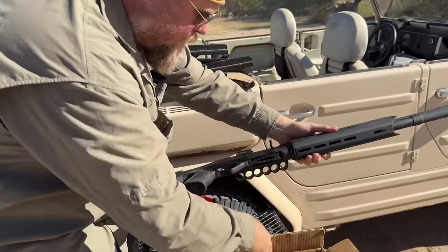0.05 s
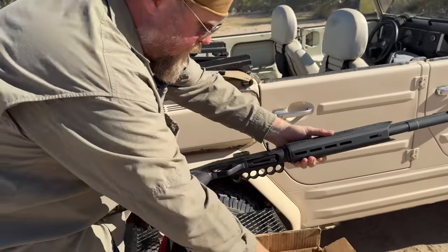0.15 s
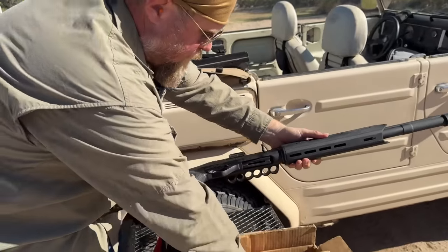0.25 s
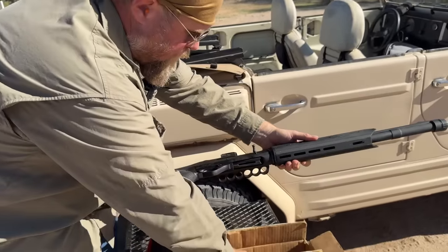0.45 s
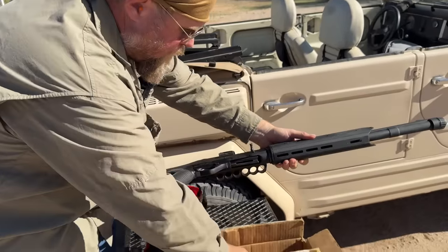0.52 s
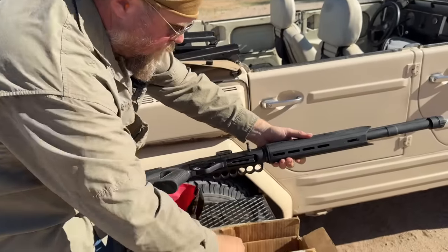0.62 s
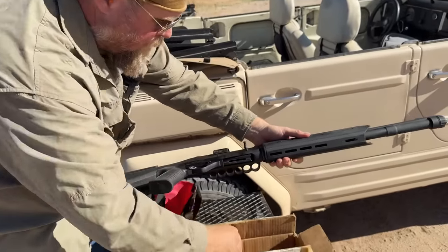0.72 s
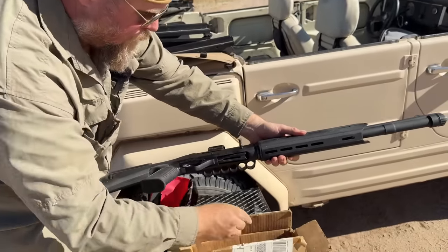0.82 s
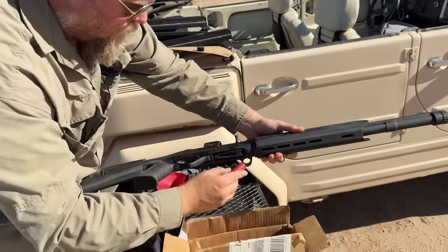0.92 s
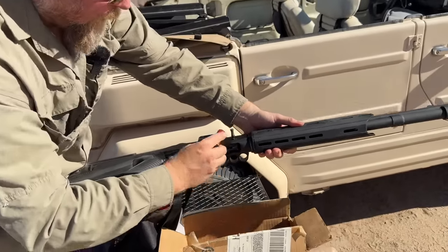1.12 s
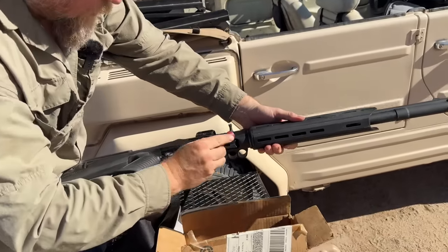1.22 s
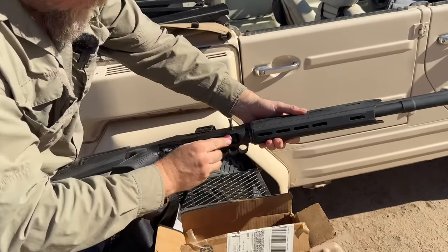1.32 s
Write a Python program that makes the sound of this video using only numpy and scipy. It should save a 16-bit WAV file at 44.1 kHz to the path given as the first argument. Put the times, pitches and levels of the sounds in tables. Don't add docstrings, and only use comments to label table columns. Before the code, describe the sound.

Close up outdoors, loose shells tick sharply together and thump a cardboard box, pause, then rattle again as one is dragged out; soft cloth rustle continues, and small metallic taps on a gun finish.

```python
import sys
import numpy as np
from scipy import signal
from scipy.io import wavfile
from scipy.ndimage import uniform_filter1d

SR = 44100
rng = np.random.default_rng(int(sys.argv[2]) if len(sys.argv) > 2 else 0)


def master(y):
    cut = np.clip(np.atleast_2d(y).T, -1, 1)
    pcm = np.round(cut * 32767)
    wavfile.write(sys.argv[1], SR, pcm.astype(np.int16))


def ratio_of_db(decibels):
    return 10 ** (np.asarray(decibels, float) / 20)


N = 59535


def evened(x):
    return x / np.sqrt(np.mean(x ** 2) + 1e-20)


def add(mix, s, sound):
    part = mix[round(s * SR):][:len(sound)]
    part += sound[:len(part)]


def curve(points, column=1):
    rows = np.array(points)
    return np.interp(np.arange(N) / SR, rows[:, 0], rows[:, column])


def colour(x, points):
    f, db = np.transpose(points)
    hz = abs(np.fft.fftfreq(8192, 1 / SR))
    spectrum_db = np.interp(np.log(hz + 1), np.log(f + 1), db, left=-60)
    log_gain = np.log(ratio_of_db(spectrum_db))
    taps = np.fft.ifft(np.exp(signal.hilbert(log_gain).conj())).real[:3000]
    return signal.oaconvolve(x, taps / np.linalg.norm(taps))[:len(x)]


def dull(x, hz):
    keep = np.exp(-2 * np.pi * hz / SR)
    return signal.lfilter([(1 - keep) ** 2], [1, -2 * keep, keep ** 2], x)


def ring(hz, t60, rise):
    t = np.arange(4000) / SR
    return np.sin(2 * np.pi * hz * t) * (1 - np.exp(-t / rise)) * ratio_of_db(-60 * t / t60)


def grains(per_s, spread_db):
    size = ratio_of_db(spread_db * np.minimum(rng.exponential(1, N), 3))
    return rng.standard_normal(N) * size * (rng.random(N) < per_s / SR)


# [f/Hz, level/dB per Hz]
AIR_SPECTRUM = [(25, -7), (70, 9.5), (130, 6.5), (400, 4.5), (1000, -0.5), (4600, -30), (10000, -23.5),
                (16000, -48)]
AIR_DB, AIR_FADE_DB_PER_S = -65, -6.5


def air():
    smooth = uniform_filter1d(uniform_filter1d(rng.standard_normal(N), 2500), 2500)
    level_db = AIR_DB + AIR_FADE_DB_PER_S * np.arange(N) / SR + evened(smooth)
    return ratio_of_db(level_db) * evened(colour(rng.standard_normal(N), AIR_SPECTRUM))


# [t/s, rustle level/dB, sheen level/dB]
SLEEVE_MOTION = [(0, -65, -75), (.07, -65, -69), (.12, -63, -83), (.2, -65, -76), (.42, -62.5, -79),
                 (.58, -72.5, -79), (.8, -68.5, -72.5), (.9, -71.5, -81), (.98, -79.5, -104),
                 (1.08, -70, -84), (1.24, -77, -105), (1.3, -73.5, -102)]
# [f/Hz, level/dB per Hz]
RUSTLE_SPECTRUM = [(500, 2), (1200, -1.5), (2000, 2.5), (3800, 3), (5500, -4), (9000, -6), (14000, -30)]
# [f/Hz, level/dB per Hz]
SHEEN_SPECTRUM = [(3000, -29), (7000, -18.5), (12000, -21.5), (15500, -30), (16500, -45)]
CRINKLE_PER_S, CRINKLE_DB = 1000, -1.5


def sleeve():
    crinkles = evened(grains(CRINKLE_PER_S, 2.1))
    rubbing = rng.standard_normal(N) + ratio_of_db(CRINKLE_DB) * crinkles
    rustle = evened(colour(rubbing, RUSTLE_SPECTRUM)) * ratio_of_db(curve(SLEEVE_MOTION))
    sheen = evened(colour(rng.standard_normal(N), SHEEN_SPECTRUM))
    return rustle + sheen * ratio_of_db(curve(SLEEVE_MOTION, column=2))


# [t/s, level/dB]
STIR = [(0, -64.5), (.212, -67), (.225, -42.5), (.39, -40), (.43, -56), (.6, -51.5), (.72, -69.5),
        (.822, -78.5), (.832, -40.5), (.95, -59), (.985, -64.5), (1.24, -77.5), (1.29, -61.5),
        (1.33, -65.5)]
# [f/Hz, width/Hz, level/dB]
BOX_MODES = [(146, 76, -12.5), (222, 92, -3), (293.7, 75, 3), (386.7, 54.7, 3), (465.6, 64, 1),
             (525, 73, -3.5), (702, 79.3, -1.5)]
STIR_PER_S, STIR_SPREAD_DB = 500, 3.5


def hollow(x):
    out = np.zeros(N)
    for hz, width, db in BOX_MODES:
        out += ratio_of_db(db) * signal.oaconvolve(x, ring(hz, 1.57 / width, 0.0052))[:N]
    return out


def shuffle():
    return evened(hollow(grains(STIR_PER_S, STIR_SPREAD_DB))) * ratio_of_db(curve(STIR))


def chatter():
    clinks = np.zeros(N)
    for hz in np.geomspace(1900, 6500, num=12):
        clinks += signal.oaconvolve(grains(99, 0.92), ring(hz, 0.0041, 0.00028))[:N]
    return evened(clinks) * ratio_of_db(curve(STIR) - 25)


# [t/s, peak level/dB, ring f/Hz, crack against ring/dB, crack t60/s]
TICKS = [(.1938, -57, 9000, 12, 0.022), (.2167, -38.5, 8550, -5, 0.016), (.2255, -30, 3280, -7, 0.048),
         (.250, -36.5, 3170, -11, 0.028), (.278, -43.5, 3150, 2, 0.049), (.2841, -39.5, 3800, 4.5, 0.021),
         (.2895, -43, 7130, 5.5, 0.019), (.2975, -41.5, 3800, 0, .035), (.313, -43, 3830, -16, .02),
         (.320, -36, 1800, -5, 0.011), (.3245, -52, 10400, -7, .02), (.3375, -58, 8200, -2, .015),
         (.3417, -34.5, 3960, 3, 0.024), (.3682, -43.5, 7800, 8.5, 0.024), (.3784, -34.5, 8050, 2.5, 0.018),
         (.3946, -39, 3840, -4, 0.024), (.4145, -45, 3780, -17, 0.027), (.439, -59, 7060, 4, 0.014),
         (.4435, -48, 8030, 7, 0.027), (.4527, -52.5, 5470, 11.5, 0.028), (.467, -62, 7040, 4, 0.034),
         (.4752, -41.5, 7350, 3, 0.026), (.4876, -41.5, 5380, -2, 0.009), (.5056, -43.5, 2460, 5.5, 0.018),
         (.5385, -60, 6940, 6, .03), (.5612, -34.5, 6970, 3, 0.028), (.5615, -48, 12300, -5, 0.016),
         (.6087, -40, 6900, -6.5, 0.026), (.7482, -40, 2070, -12, .02), (.788, -50, 2440, -9, 0.025),
         (.8255, -44, 6600, 8.5, 0.01), (.8462, -44, 5230, 4, .025), (.8455, -38, 3300, 1, .02),
         (.8618, -36, 3930, -8, 0.026), (.8738, -34, 3640, -7.5, 0.026), (.9086, -51, 6600, -6, 0.025),
         (.9283, -41.5, 3700, -7.5, 0.037), (.935, -47.5, 6700, -9, 0.029)]
# [f/Hz, level/dB per Hz]
CRACK_SPECTRUM = [(600, 2.5), (1200, -0.5), (3200, 2.5), (7000, 1), (12500, -6.5), (15800, -25),
                  (17000, -56)]
TICK_T60, RATTLE_S, TICK_SPREAD = 0.011, 0.0036, 0.09
TICK_RISE_S, SNAP_T60 = 0.00062, 0.0033


def clicks(rows, snap_db, rise):
    rings, cracks, t = np.zeros(N), np.zeros(N), np.arange(2000) / SR
    for s, db, hz, crack_db, crack_t60 in rows:
        add(rings, s, 0.76 * ratio_of_db(db) * ring(hz, TICK_T60, TICK_RISE_S))
        for off, late in rng.random((4, 2)):
            near_hz = hz * (1 + TICK_SPREAD * (2 * off - 1))
            add(rings, s + RATTLE_S * late, 0.34 * ratio_of_db(db) * ring(near_hz, TICK_T60, TICK_RISE_S))
        crack = ratio_of_db(-60 * t / crack_t60) * (1 - np.exp(-t / rise))
        snap = ratio_of_db(snap_db - 60 * t / SNAP_T60)
        hiss = dull(rng.standard_normal(2000), 2.62 * hz)
        add(cracks, s, ratio_of_db(db + crack_db - 7.0) * (crack + snap) * hiss)
    return rings + colour(cracks, CRACK_SPECTRUM)


def ticks():
    return clicks(TICKS, snap_db=-6.5, rise=TICK_RISE_S)


# [t/s, peak level/dB, wall f/Hz, contact/s]
KNOCKS = [(0.2204, -24.5, 578, 0.0022), (.227, -30, 510, 0.0018), (.259, -35.5, 558, 0.004),
          (.2855, -32.5, 438, 0.0076), (0.304, -36.5, 411, 0.0083), (.3215, -51, 695, 0.0027),
          (0.327, -40, 460, 0.002), (.340, -33.5, 528, 0.0042), (.367, -36.5, 604, 0.0063),
          (0.3812, -18, 255, 0.0016), (.396, -29.5, 384, 0.01), (.420, -38.5, 389.5, 0.023),
          (0.459, -32.5, 354, 0.0016), (.434, -32, 333, 0.0016), (.470, -41.5, 330, 0.0017),
          (0.479, -40.5, 316, 0.0066), (.541, -44, 585, 0.0019), (.552, -45, 717, 0.0043),
          (.565, -32.5, 410, 0.0054), (.573, -35.5, 390, 0.0015), (0.7496, -38, 496, 0.001),
          (.776, -45, 664, 0.0012), (.832, -31.5, 433, 0.0016), (.839, -37.5, 320, 0.0032),
          (.863, -41, 300, 0.0038), (.880, -34, 401, 0.0069), (0.91, -42.5, 430, 0.007),
          (0.932, -40.5, 420, 0.0052), (.946, -46, 347, 0.0023), (1.016, -48.5, 475, 0.0014),
          (1.058, -61, 500, 0.0034), (1.202, -56.5, 450, 0.0059), (1.222, -58, 540, .004),
          (1.301, -52, 648, .002)]
BOX_SHARE_DB = -0.5


def knock(hz, contact):
    u = np.arange(3000) / SR / contact
    return u ** 2 * np.exp(2 - 2 * u) * np.sin(2 * np.pi * hz * (u - 1) * contact)


def knocks():
    walls, pushes = np.zeros(N), np.zeros(N)
    for s, db, hz, contact in KNOCKS:
        add(walls, s - contact, ratio_of_db(db) * knock(hz, contact))
        add(pushes, s, ratio_of_db(db + BOX_SHARE_DB) * np.ones(1))
    return walls + .5 * hollow(pushes)


# [t/s, peak level/dB, f/Hz, t60/s]
SINGING = [
    (.284, -58, 5930, .05),
    (.303, -60, 5960, .12),
    (.3245, -60, 5880, .06),
]


def singing():
    out = np.zeros(N)
    for s, db, hz, t60 in SINGING:
        add(out, s, ratio_of_db(db) * ring(hz, t60, 0.0012))
    return out


# [t/s, f/Hz]
WHISTLES = [
    [(.63, 8400), (.655, 8800), (.69, 8350), (.72, 8600), (.752, 9950), (.77, 9500), (.795, 9800)],
    [(.765, 14200), (.78, 14300), (.805, 14100), (.845, 12300), (.86, 11600)],
    [(.785, 11150), (.8, 11300), (.825, 11000), (.85, 10400)],
    [(.885, 12300), (.905, 11700)],
    [(.78, 8900), (.81, 9000), (.825, 8800)],
    [(.68, 12100), (.72, 12300)],
]
WHISTLE_DB = [-80, -81, -80, -84, -83, -87]


def whistles():
    out, t = np.zeros(N), np.arange(N) / SR
    for rows, db in zip(WHISTLES, WHISTLE_DB):
        gate = np.clip(np.minimum(t - rows[0][0], rows[-1][0] - t) / .008, 0, 1)
        waver = evened(uniform_filter1d(rng.standard_normal(N), size=200))
        wobble = evened(uniform_filter1d(rng.standard_normal(N), size=200))
        hz = uniform_filter1d(curve(rows), size=500) + 20 * wobble
        tone = np.sin(2 * np.pi * np.cumsum(hz) / SR)
        out += gate * (1 + .25 * waver) * ratio_of_db(db + 3) * tone
    return out


# [t/s, level/dB]
DRAG = [(.73, -118), (.742, -51.5), (.76, -57.5), (.77, -67), (.79, -52), (.81, -55), (.822, -84)]
# [f/Hz, level/dB per Hz]
CARD_SPECTRUM = [(150, -15), (400, -12.5), (850, -11.5), (1400, -21), (2400, -15.5), (4300, -32),
                 (7000, -36), (14000, -73)]


def drag():
    scrape = grains(1500, 3.7) + 0.078 * rng.standard_normal(N)
    return evened(colour(scrape, CARD_SPECTRUM)) * ratio_of_db(curve(DRAG))


# [t/s, peak level/dB, ring f/Hz, crack against ring/dB, crack t60/s]
TOUCHES = [(0.9678, -49.5, 2280, -15, .012), (1.030, -49, 2840, 1, 0.027), (1.0345, -49.5, 2040, -2, 0.033),
           (1.0500, -52.5, 3570, -3, 0.034), (1.0566, -55, 3700, 6, 0.031), (1.064, -59, 4700, 5, 0.024),
           (1.068, -45, 4500, 7, 0.013), (1.0955, -58, 4450, 1, 0.031), (1.151, -54, 4670, 4, 0.041),
           (1.1555, -49, 4630, -3, 0.01), (1.1645, -53, 6400, -5, 0.059), (1.179, -45.5, 2390, -19, .02),
           (1.2017, -59, 7860, 2, 0.044), (1.218, -56.5, 2485, -5, .03), (1.288, -58, 6520, 7, 0.046),
           (1.2985, -52, 3380, 7, 0.027)]


def touches():
    return clicks(TOUCHES, snap_db=-14, rise=.0015)


# [t/s, peak level/dB, rattle length/s]
PORT_HITS = [
    (1.0047, -33.5, 0.0055),
    (1.159, -39.5, 0.0077),
    (1.2691, -38, 0.0019),
]
# [f/Hz, level/dB, t60/s]
PORT_MODES = [
    [(814, 7.4, 0.036), (1032, 3.4, 0.027), (1510, 2.6, 0.014), (1940, 3.4, 0.023), (3680, 1.2, 0.036),
     (4150, 2.7, 0.018), (4740, 8.8, 0.015), (6100, 2, 0.011)],
    [(882, 12, 0.032), (980, 8, 0.017), (1870, 12.5, 0.017), (2200, 7.5, 0.024), (3170, 6, 0.043),
     (3930, 10, 0.0083), (6500, -4, 0.013), (8470, 1, 0.017)],
    [(814, 14.5, 0.024), (1070, -5.5, 0.042), (1684, 6, 0.029), (2084, 17.5, .016), (3160, 11, 0.014),
     (3470, 11.5, 0.024), (4850, 11.5, 0.011), (8640, 4.5, 0.0089)],
]
PORT_CRACK_DB, PORT_CRACK_T60 = -13, .02


def port():
    out, cracks, t = np.zeros(N), np.zeros(N), np.arange(2000) / SR
    for (s, db, length), modes in zip(PORT_HITS, PORT_MODES):
        for k in range(3):
            hit = np.zeros(4000)
            for hz, mode_db, t60 in modes:
                detune = 1 + 0.083 * (rng.random() - .5)
                hit += ratio_of_db(mode_db) * ring(hz * detune, t60, 0.00019)
            add(out, s + length * k / 2, ratio_of_db(db - 18 - 11.7 * k) * hit)
        fall_db = 60 * np.maximum(t - length, 0) / PORT_CRACK_T60
        add(cracks, s, ratio_of_db(db + PORT_CRACK_DB - fall_db) * rng.standard_normal(2000))
    return out + colour(dull(cracks, 6000), CRACK_SPECTRUM)


def scene():
    no_bass = signal.butter(3, 108, "high", fs=SR, output="sos")
    box = signal.sosfilt(no_bass, shuffle() + knocks() + drag())
    shells = chatter() + ticks() + singing() + touches()
    cloth = sleeve() + whistles()
    return (air() + cloth + box + shells + port())[None]


def low_pass(x):
    return signal.sosfilt(signal.butter(12, 15850, fs=SR, output="sos"), x)


def record(dry):
    return low_pass(dry)


dry = scene()
out = record(dry)
master(out)
```